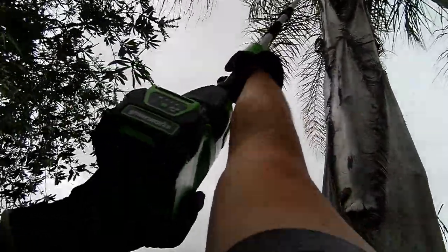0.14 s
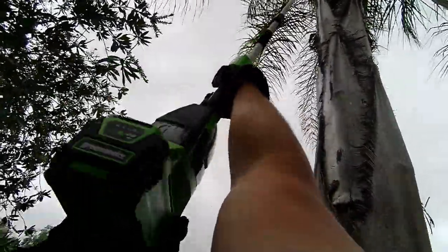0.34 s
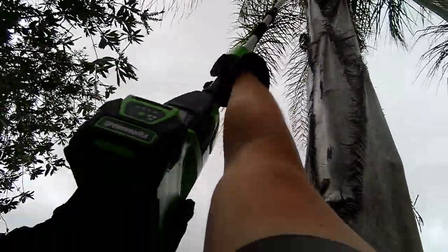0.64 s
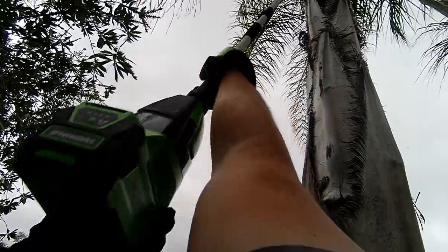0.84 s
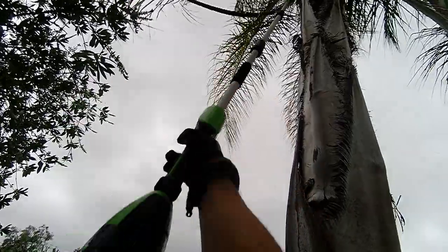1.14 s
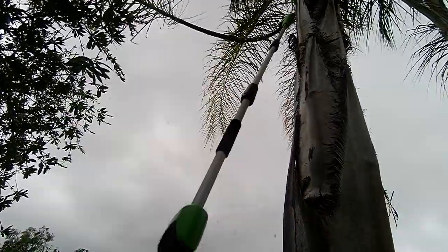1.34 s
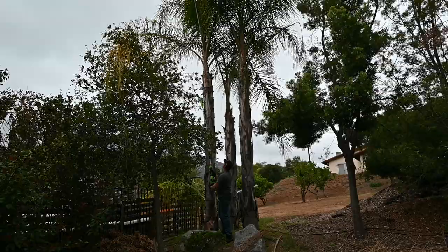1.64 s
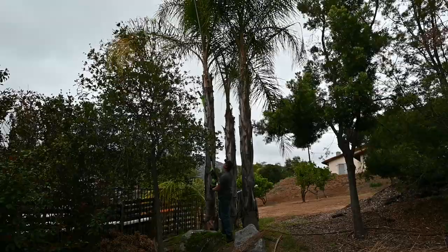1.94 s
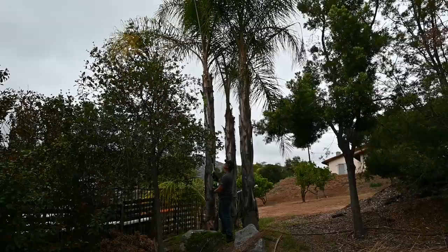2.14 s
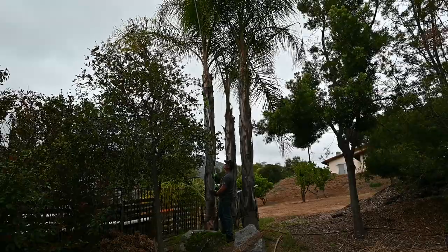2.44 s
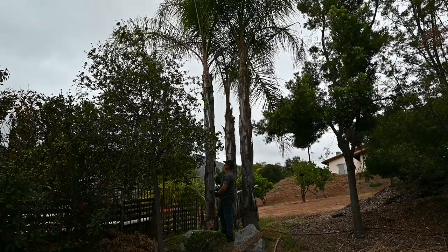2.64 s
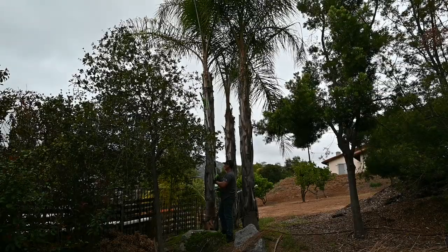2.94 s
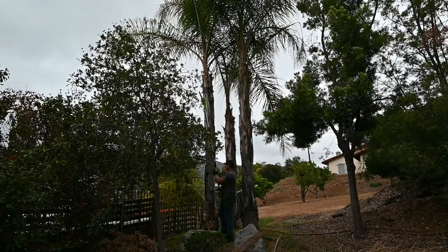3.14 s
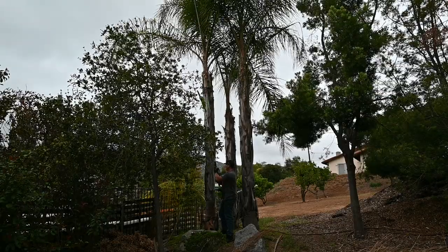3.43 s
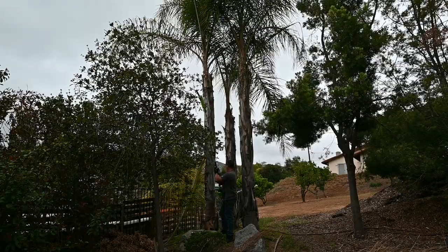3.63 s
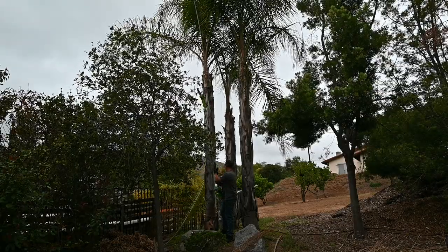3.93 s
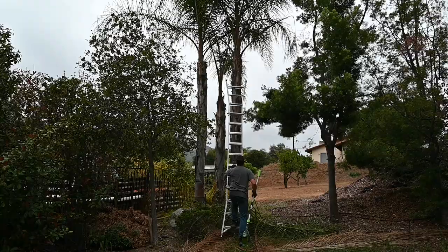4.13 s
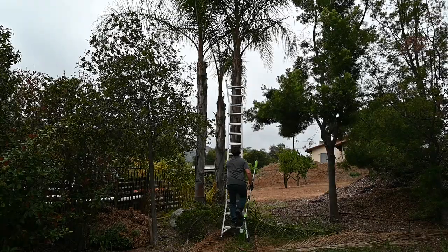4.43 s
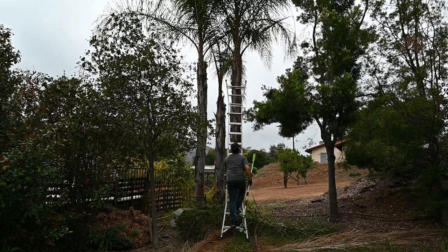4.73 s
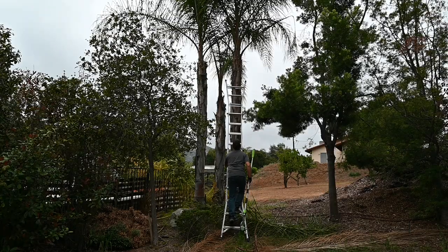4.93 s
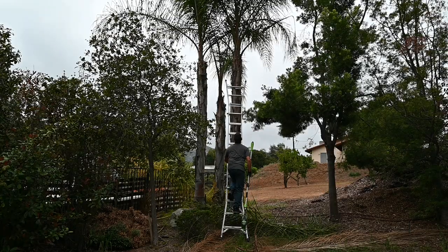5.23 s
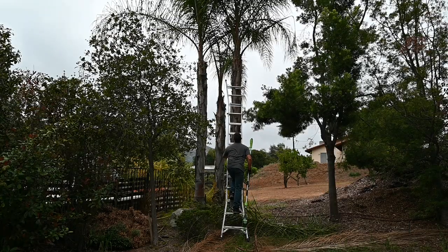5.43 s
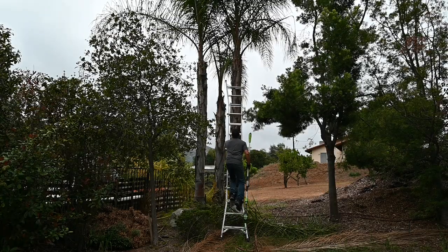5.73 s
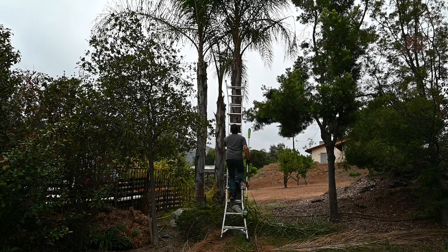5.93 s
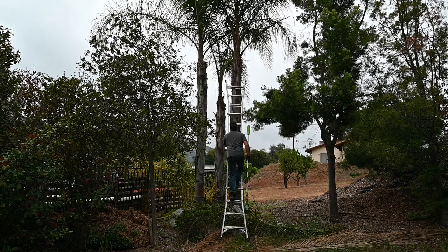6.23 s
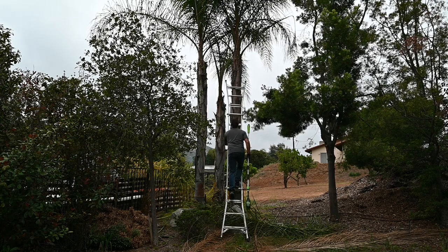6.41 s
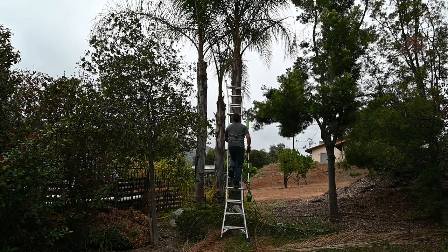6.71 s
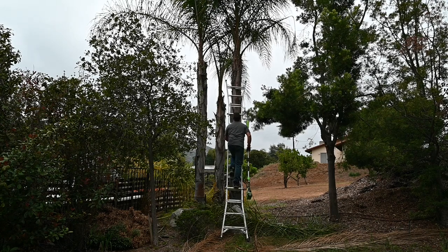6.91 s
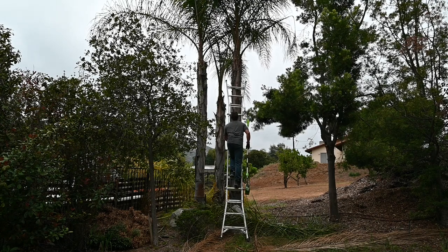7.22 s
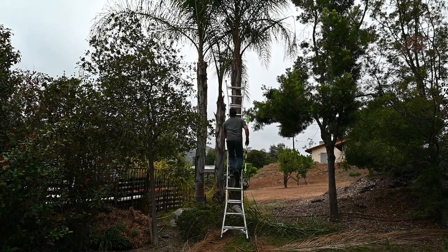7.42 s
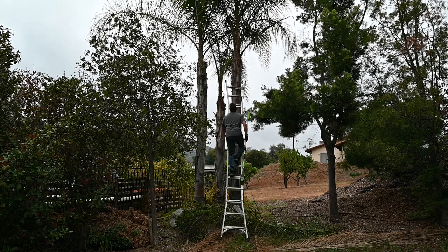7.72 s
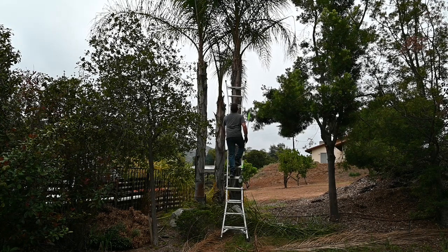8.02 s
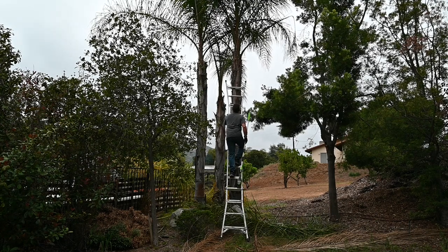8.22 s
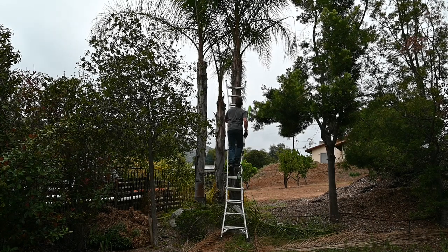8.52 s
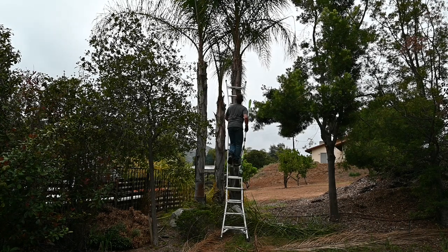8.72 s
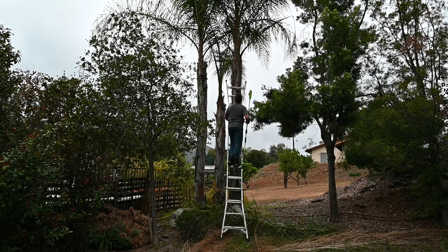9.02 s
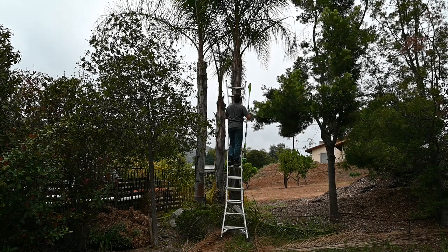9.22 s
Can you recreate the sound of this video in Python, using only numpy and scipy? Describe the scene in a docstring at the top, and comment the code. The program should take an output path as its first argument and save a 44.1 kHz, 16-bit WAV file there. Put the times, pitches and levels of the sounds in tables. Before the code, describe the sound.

Outdoors, the microphone hears a battery saw already at full speed: gritty chain chatter, hollow housing rattle, thin gear whine. Its pitch dips twice in the cut, then drops quickly and the slack chain slaps to rest. Dry leaflets rush down, land, rustle and crack. After a hard cut, much softer footsteps ring on metal rungs, joints tick, and scattered birds call over steady air and hum.

```python
"""A cordless pole saw bites through a palm frond and coasts to a stop, its chain clacking ever slower.
The frond swishes down, snaps and settles in dry leaves. After an abrupt change of scene someone climbs
an aluminium ladder while birds call in the garden. Soft air and a low hum run under everything.
Friction is random grains in filtered bands, whines follow the sprocket, impacts ring through resonances,
and birds are tones of gliding or shaken pitch."""
import sys
import numpy as np
from scipy import signal
from scipy.fft import rfft, irfft
from scipy.io import wavfile
from scipy.ndimage import uniform_filter1d

SR = 44100
rng = np.random.default_rng(int(sys.argv[2]) if len(sys.argv) > 2 else 0)


def transcribe(signal):
    """Save signal, clipped to [-1, 1], as a 16-bit WAV file at the path in sys.argv[1]."""
    frames = np.atleast_2d(signal).T
    limited = np.clip(frames, -1, 1)
    pcm = np.round(limited * 32767).astype(np.int16)
    wavfile.write(sys.argv[1], SR, pcm)


N = 412776
TIME = np.arange(N) / SR
STOP_S, SCENE_CHANGE_S = 2.205, 4.15

# Teeth catching in the stalk. Each row: centre in seconds, length in seconds, level in dB.
BITE_EVENTS = [(0.312, 0.065, -27), (0.902, 0.0162, -28.5), (0.913, 0.016, -33.5), (0.935, 0.0182, -18),
               (1.008, 0.022, -25), (1.078, 0.0376, -26), (1.12, 0.016, -25), (1.264, 0.0242, -27),
               (1.319, 0.029, -31), (1.381, 0.023, -23.5)]
# Notches of the microphone port. Each row: centre in Hz, width in Hz, gain at full depth in dB.
MIC_PORT_NOTCHES = [(4813, 148, -11.5), (5930, 1340, -15.5)]
# Spectrum of dragging or stirring stalks. Each row: frequency in Hz, relative level in dB per Hz.
STALK_SPECTRUM = [(80, -33.5), (200, -13.5), (450, -3.5), (800, 2), (1100, 0.5), (1550, 1), (2100, -3),
                  (3500, -2.5), (6000, -26)]
# Spectrum of gritty ticks and diffuse treble. Each row: frequency in Hz, relative level in dB per Hz.
TICK_SPECTRUM = [(3000, -34), (6200, -7.5), (7800, 10.5), (9500, 8.5), (12500, -2), (15000, -38.5)]
# Spectrum of garden air. Each row: frequency in Hz, relative level in dB per Hz.
GARDEN_SPECTRUM = [(76, -24.5), (130, -11), (228, -4.5), (434, -5.5), (520, -1.5), (598, -4.5), (661, -2),
                   (842, -4.5), (1730, -10), (1960, -12), (4370, -14.5), (4830, -18.5), (15800, -26)]


def from_db(db):
    """Amplitude ratio of a level in dB."""
    return 10 ** (np.asarray(db) / 20)


def rms_one(x):
    """Scale to rms 1."""
    return x / np.sqrt(np.mean(x ** 2) + 1e-20)


def fade(start_s, end_s):
    """Ramp from 0 at start to 1 at end."""
    return np.clip((TIME - start_s) / (end_s - start_s), 0, 1)


def swell(centre_s, length_s):
    """A smooth hump of height 1."""
    return np.exp(-2 * ((TIME - centre_s) / length_s) ** 2)


def noise():
    """White noise of rms 1."""
    return rng.standard_normal(N)


def drift(rate_hz, count=N):
    """Slow random wander of rms near 1: noise through two equal low-pass poles."""
    r = np.exp(-2 * np.pi * rate_hz / SR)
    return rms_one(signal.lfilter([1], [1, -2 * r, r * r], rng.standard_normal(count + SR))[SR:])


def body(x, spectrum, resonances=()):
    """Causal filter from a smooth spectrum and resonances; white noise keeps its power."""
    size = 2 ** 13
    hz = np.maximum(np.arange(size // 2 + 1) * SR / size, 1)
    points = np.array(spectrum)
    db = np.interp(np.log(hz), np.log(points[:, 0]), points[:, 1])
    for centre_hz, width_hz, boost_db in resonances:
        db = db + boost_db / (1 + (2 * (hz - centre_hz) / width_hz) ** 2)
    cepstrum = irfft(np.log(from_db(db)))
    # minimum phase: nothing sounds early
    response = irfft(np.exp(rfft(2 * cepstrum[:size // 2], size)))
    return signal.oaconvolve(x, response / np.linalg.norm(response))[:N]


def grains(per_s, spread_db):
    """Random clicks of uneven size; rms 1."""
    sizes = from_db(spread_db * np.minimum(rng.exponential(1, N), 4)) * rng.choice([-1, 1], N)
    return rms_one(sizes * (rng.random(N) < per_s / SR))


def blows(times_s, levels_db, t60_s):
    """An envelope that jumps at each blow and dies away by 60 dB in t60."""
    kicks = np.zeros(N)
    kicks[np.round(np.asarray(times_s) * SR).astype(int)] = from_db(levels_db)
    return signal.lfilter([1], [1, -from_db(-60 / (t60_s * SR))], kicks + 1e-18)


def background():
    """Soft garden air, rumble, faint stirring leaves and a hum that skips half a cycle as the scene changes."""
    # Each row: frequency in Hz, relative level in dB per Hz.
    rumble_spectrum = [(20, -18), (45, -6), (120, 1), (200, -28), (500, -53)]
    hum_hz, hum_db = 91.38, -50.5
    air = from_db(-58.3066 + 0.213 * drift(2.37)) * body(noise(), GARDEN_SPECTRUM)
    rumble = from_db(-74.0) * body(noise(), rumble_spectrum)
    stirring_db = -71.0 + 3.17 * drift(2.6)
    leaves = from_db(stirring_db) * body(grains(250, spread_db=3.0), STALK_SPECTRUM)
    cycles = hum_hz * TIME + .5 * fade(SCENE_CHANGE_S - .002, SCENE_CHANGE_S)
    hum = from_db(hum_db) * np.sqrt(2) * np.sin(2 * np.pi * cycles)
    return air + rumble + leaves + hum


def note(start_s, length_s, pitch, db, rasp_hz, partials=((1, 0),)):
    """A bird note; pitch gives Hz over its course 0 to 1, rasp shakes it, partials are (multiple, dB)."""
    skew = 0.686   # under 1: peaks early
    flutter_db, flutter_hz = 1.5, 29
    u = np.linspace(0, 1, int(length_s * SR))
    shake = rms_one(uniform_filter1d(rng.standard_normal(len(u)), size=40))
    phase = 2 * np.pi * np.cumsum(pitch(u) + rasp_hz * shake) / SR
    flutter = from_db(flutter_db * drift(flutter_hz, count=SR)[:len(u)])
    envelope = np.sqrt(2 * np.abs(np.sin(np.pi * u ** skew)))
    waves = sum(from_db(db + part_db) * np.sin(k * phase) for k, part_db in partials)
    return np.pad(flutter * envelope * waves, (int(start_s * SR), N))[:N]


def whistle(start_s, length_s, start_hz, end_hz, db):
    """A slurred tone: pitch moves quickly at first, flattening towards its last value."""
    bend = 2.2   # time constants in one whistle

    def slur(u):
        return start_hz + (end_hz - start_hz) * np.expm1(-bend * u) / np.expm1(-bend)
    return note(start_s, length_s, slur, db, rasp_hz=22)


def mew(start_s, length_s, hz, arch_hz, db):
    """A nasal note: overtones 2 to 5 of an arched pitch, coloured by the throat."""
    # Throat response. Each row: frequency in Hz, gain in dB.
    throat_response = [(1200, -10.5), (1800, -9), (3000, -8), (4100, 4.5), (6100, -2), (8200, -21)]
    multiples = np.arange(2, 6)
    throat_hz, throat_db = np.transpose(throat_response)
    partials = zip(multiples, np.interp(multiples * hz, throat_hz, throat_db))
    return note(start_s, length_s, lambda u: hz + arch_hz * np.sin(np.pi * u), db, rasp_hz=10.7,
                partials=partials)


def rasp(start_s, length_s, db):
    """A chirp roughened by fast random shaking of its pitch."""
    return note(start_s, length_s, lambda u: np.full(len(u), 4230), db, rasp_hz=562)


def birds():
    """Whistles, nasal notes and rasps, scattered by the trees as a decaying noise echo."""
    # Each row: start in seconds, length in seconds, start in Hz, end in Hz, level in dB.
    whistle_events = [(5.606, 0.08, 5510, 4358, -55), (5.693, 0.126, 3190, 3534, -58),
                      (5.793, 0.069, 3530, 3530, -67), (5.95, 0.053, 2165, 2096, -69),
                      (6.022, 0.0396, 2355, 2600, -66), (7.255, 0.1, 3424, 2697, -66.5),
                      (7.867, 0.109, 3250, 2540, -70.5), (7.955, .05, 5770, 5390, -71.5),
                      (8.303, 0.0532, 4400, 4856, -59), (8.641, 0.0298, 3985, 4550, -65.5),
                      (8.65, 0.067, 2173, 2867, -59), (8.77, 0.097, 2930, 2666, -64),
                      (9.0, .42, 5400, 4280, -67.5)]
    # Each row: start in seconds, length in seconds, pitch in Hz, arch in Hz, level in dB.
    mew_events = [(5.582, 0.056, 1351, 16.8, -61.5), (8.39, 0.22, 1980, 66, -59.5),
                  (8.719, 0.063, 525.7, 94, -55.5), (9.127, 0.0588, 606, 53.6, -56),
                  (9.30, 0.025, 545, 40.5, -55.5)]
    # Each row: start in seconds, length in seconds, level in dB.
    rasp_events = [(5.403, 0.0514, -60), (6.869, 0.079, -63.5), (8.019, .042, -58.5), (8.268, 0.099, -59)]
    song = sum(whistle(*row) for row in whistle_events)
    song = song + sum(mew(*row) for row in mew_events)
    song = song + sum(rasp(*row) for row in rasp_events)
    scatter = rng.standard_normal(SR // 2) * from_db(-60 * TIME[:SR // 2] / 0.296)   # t60 in s
    return song + from_db(-3.5) * signal.oaconvolve(song, scatter / np.linalg.norm(scatter))[:N]


def ladder():
    """Boots thud on rungs and ring the rails; joints clank and tick with grit; the garden adds a faint tail."""
    # Boots on rungs. Each row: start in seconds, peak level in dB, rail ring level in dB.
    boot_events = [(4.313, -53.5, -44.5), (4.387, -38.5, -49.5), (4.413, -41, -50), (4.769, -39, -44.5),
                   (5.496, -35.5, -37.5), (5.503, -35, -61.5), (5.552, -36.5, -59.5), (5.622, -41, -64),
                   (6.303, -43, -64.5), (6.425, -35, -47.5), (6.591, -43.5, -59.5), (6.668, -49, -58.5),
                   (7.047, -34.5, -46), (7.325, -46, -51), (7.414, -44.5, -51), (7.949, -43.5, -54.5),
                   (8.039, -42, -50.5), (8.564, -37.5, -55.5), (8.613, -37, -48.5), (8.688, -45.5, -61),
                   (9.064, -33, -42), (9.171, -37, -48.5), (9.237, -35, -43.5), (9.277, -38, -50)]
    # Joints knocking as weight shifts. Each row: start in seconds, peak level in dB, grit level in dB.
    clank_events = [(4.246, -43.5, -73.5), (4.3139, -34.5, -49.5), (4.8172, -42.5, -53.5),
                    (5.4935, -40, -59.5), (5.882, -37, -56), (6.2601, -46.5, -71), (6.3026, -50.5, -59.5),
                    (6.4053, -41.5, -59.5), (6.421, -51, -60.5), (7.4157, -47.5, -69.5),
                    (7.6144, -46.5, -63), (8.3712, -40.5, -54), (9.1687, -44.5, -63.5), (9.2352, -45, -58)]
    # Spectra of thud, rails and clank. Each row: frequency in Hz, relative level in dB per Hz.
    thud_spectrum = [(80, -14), (200, -2.5), (350, 6.5), (580, 7), (800, 2), (1100, -17.5), (2200, -38.5),
                     (5000, -62.5)]
    rail_spectrum = [(300, -39.5), (650, -9), (900, 5), (1400, -1.5), (1800, -8.5), (2600, -36.5),
                     (6000, -47.5)]
    clank_spectrum = [(900, -11.5), (1700, 2.5), (2400, -4), (3500, -2), (4800, -3.5), (6200, -21.5),
                      (12000, -53)]
    # Ladder resonances. Each row: centre in Hz, width in Hz, boost in dB.
    rung_modes = [(375, 50, -1.5), (574, 40, 4), (797.5, 54, 6), (1086, 23, 5.5), (1360, 80, 1),
                  (1775, 88, -6), (2504, 130, 6.5), (3350, 120, -2), (4330, 180, -1.5)]
    thud_db = -10   # against a boot's peak
    ring_db, scuff_db = -3, -9   # ring onset and sole scuff, against rail ring level
    knock_db, jolt_db = -7.5, -18.5   # clank and frame thud, against a joint's peak
    boot_s, boot_db, rail_db = np.transpose(boot_events)
    clank_s, clank_db, grit_db = np.transpose(clank_events)

    def contact(times_s, level_db, spectrum, t60_s, tail_db, hard):
        """Decaying chatter and a first-touch click, rung by the ladder."""
        rattle = blows(times_s, level_db, t60_s) + blows(times_s, level_db + tail_db, t60_s=0.78)
        click = blows(times_s, level_db, t60_s=1 / SR) * np.sqrt(t60_s * SR)
        chatter = grains(7000, spread_db=0)
        return body(rattle * chatter + hard * click, spectrum, rung_modes)

    thud = contact(boot_s, boot_db + thud_db, thud_spectrum, t60_s=0.0946, tail_db=-29, hard=0.226)
    ring = contact(boot_s, rail_db + ring_db, rail_spectrum, t60_s=0.1275, tail_db=-48.0, hard=0.142)
    scuff = contact(boot_s, rail_db + scuff_db, clank_spectrum, t60_s=0.0705, tail_db=-21.5, hard=0.047)
    clank = contact(clank_s, clank_db + knock_db, clank_spectrum, t60_s=0.094, tail_db=-17.0, hard=0.094)
    jolt = contact(clank_s, clank_db + jolt_db, thud_spectrum, t60_s=0.11, tail_db=-20, hard=0.062)
    grit = contact(clank_s, grit_db, TICK_SPECTRUM, t60_s=0.0766, tail_db=-19, hard=0.042)
    return thud + ring + scuff + clank + jolt + grit


def frond():
    """Leaflets brush, louder until the frond lands; then it rustles, the stalk drags and dry stalks snap."""
    # Dry stalks breaking. Each row: start in seconds, peak level in dB.
    snap_events = [(3.404, -34.5), (3.456, -38), (3.58, -30.5), (3.681, -28.5), (3.889, -45.5),
                   (3.984, -35.5)]
    # Heavy end bumping down. Each row: start in seconds, level in dB.
    bump_events = [(2.905, -49), (2.96, -48.5)]
    # Spectra of leaflets, snaps and bumps. Each row: frequency in Hz, relative level in dB per Hz.
    leaflet_spectrum = [(900, -24), (1700, -8), (2500, -1.5), (4000, 1), (5400, 3), (7000, -0.5), (8500, 0),
                        (10500, -5.5), (13000, -14), (15800, -20)]
    snap_spectrum = [(300, -9), (800, 6), (1500, 1), (2400, -2.5), (4200, 6), (6000, -21.5), (14000, -20.5)]
    bump_spectrum = [(80, -22.5), (170, -14), (250, 1.5), (500, 1.5), (1200, -27), (4000, -50)]
    # Frond resonances. Each row: centre in Hz, width in Hz, boost in dB.
    frond_modes = [(1545, 430, 9), (5204, 450, 1.5)]
    landing_s, build_db_per_s, settle_db_per_s = 3.0243, 2.5, 64
    swish_db, drag_db = -34, -42   # leaflets and stalk at landing
    rustle_db, rustle_fall_db_per_s, ground_drag_db = -47, 1.07, -49.5
    crack_db, crunch_db, crunch_t60_s = -12.5, -14, 0.326   # levels against a break's peak
    since_s = TIME - landing_s
    falling_db = np.minimum(build_db_per_s * since_s, -settle_db_per_s * since_s)
    falling = from_db(falling_db) * fade(1.61, 2.059)
    snap_s, snap_db = np.transpose(snap_events)
    crunch = blows(snap_s, snap_db + crunch_db, crunch_t60_s)

    rustle = from_db(rustle_db - rustle_fall_db_per_s * since_s) * (since_s > 0)
    swish_level = np.hypot(from_db(swish_db) * falling, rustle) * from_db(0.73 * drift(24))
    notches = [(hz, width_hz, db * 0.612) for hz, width_hz, db in MIC_PORT_NOTCHES]
    swish = swish_level * body(grains(18000, spread_db=3.0), leaflet_spectrum, frond_modes + notches)

    ground_drag = from_db(ground_drag_db) * (TIME > snap_s[0])
    drag_level = np.hypot(from_db(drag_db) * falling + crunch, ground_drag) * from_db(0.62 * drift(25))
    drag = drag_level * body(grains(3500, spread_db=2.0), STALK_SPECTRUM)

    cracks = body(blows(snap_s, snap_db + crack_db, t60_s=0.084) * noise(), snap_spectrum)
    bump_level = blows(*np.transpose(bump_events), t60_s=0.143)
    bumps = body(bump_level * grains(3500, spread_db=1.0), bump_spectrum)
    return (swish + drag + cracks + bumps) * (TIME < SCENE_CHANGE_S)


def slaps():
    """Each slap of the slack, slowing chain rings the pole; the ring stays in the mid band, without bass."""
    # Each row: start in seconds, level in dB before the common 0.5 dB lift.
    slap_events = [(1.553, -18), (1.585, -18.5), (1.612, -31), (1.67, -22), (1.815, -27.5), (1.878, -31)]
    # Pole modes. Each row: frequency in Hz, relative level in dB, t60 in seconds.
    slap_modes = [(972, -12.5, 0.032), (1219, -23.5, 0.058), (1530, -27, 0.028), (1713, -2.5, 0.0555),
                  (2833, -14.5, 0.035)]
    slap_s, slap_db = np.transpose(slap_events)
    rings = np.zeros(N)
    for hz, mode_db, t60_s in slap_modes:
        envelope = blows(slap_s, slap_db + mode_db + .5, t60_s)
        rings += envelope * np.sin(2 * np.pi * hz * TIME + .5 * drift(59))
    return signal.sosfilt(signal.butter(2, [600, 3500], "band", fs=SR, output="sos"), rings)


def bites():
    """Teeth tear fibres in short gritty bursts."""
    # Each row: frequency in Hz, relative level in dB per Hz.
    bite_spectrum = [(100, -26), (200, -16.5), (450, -1), (850, 2), (1500, 4), (2200, -3.5), (3200, -3.5),
                     (6000, -19.5), (15000, -21)]
    force = sum(from_db(db) * swell(s, length_s) for s, length_s, db in BITE_EVENTS)
    return body(force * grains(3500, spread_db=2.5), bite_spectrum)


def sprocket_speed():
    """Sprocket turns per s: once the trigger is let go the motor brakes hard, then the chain coasts down."""
    # Driven speed, sagging twice under load. Each row: time in seconds, speed in turns per second.
    driven_speed = [(0.0, 66.02), (0.21, 67.77), (0.26, 66.82), (0.33, 61.21), (0.42, 67.16), (0.57, 68.75),
                    (0.67, 68.1), (0.885, 70.55), (0.96, 61.2), (1.2, 66.2), (1.25, 64.26)]
    brake_turns_per_s2, coast_turns_per_s2 = 181, 44
    driven = np.interp(TIME, *np.transpose(driven_speed))
    release_s = driven_speed[-1][0]
    braked = driven - brake_turns_per_s2 * np.maximum(TIME - release_s, 0)
    coasting = np.minimum(coast_turns_per_s2 * (STOP_S - TIME), driven)
    return np.maximum(np.maximum(braked, coasting), 1)


def chain_beat(turns, speed, clack, clack_s, link, uneven_db):
    """One hard clack per sprocket turn and a lighter one per tooth, over steady sliding; mean power near 1."""
    def strikes(cycles, per_s, decay_s):
        sizes = from_db(uneven_db * rng.standard_normal(2 ** 12))
        since_s = cycles % 1 / per_s
        return sizes[cycles.astype(int) % len(sizes)] * np.exp(-since_s / decay_s)
    teeth = 6
    clacks = clack * strikes(turns, speed, clack_s)
    links = link * strikes(teeth * turns, teeth * speed, clack_s / 2)
    power = 1 + clacks ** 2 + links ** 2
    return np.sqrt(power / uniform_filter1d(power, SR // 10))


def saw():
    """Chain and housing rattle in step with the sprocket under motor and gear whine; all grow with speed."""
    # Spectra of chain and housing. Each row: frequency in Hz, relative level in dB per Hz.
    chain_spectrum = [(1180, -38), (2000, -3.5), (2950, -1.5), (3830, -0.5), (4790, -3), (5220, -1),
                      (6100, -16), (6480, -8), (7640, -5), (9490, -5.5), (13200, -23.5), (14500, -21.5),
                      (15800, -32)]
    housing_spectrum = [(120, -39), (320, -18.5), (410, -10), (560, -5), (700, -4.5), (1000, -3),
                        (1250, -2), (1750, 3), (2050, -8.5), (2600, -13), (5000, -43)]
    # Resonances of bar and pole. Each row: centre in Hz, width in Hz, boost in dB.
    bar_modes = [(3793, 525, 4), (4356, 190, 5), (6530, 200, 1), (7867, 31, 11.5), (11800, 490, 6)]
    pole_modes = [(408.2, 28.3, 10.4), (1221, 76, 9.2), (1355.8, 27.5, 9), (1558, 63, 4.5),
                  (1735.3, 38, 5.4)]
    # Lines of motor, shrill whine and gears. Each row: multiple of sprocket rate, relative level in dB.
    motor_orders = [(6, -22), (7, -19.5), (12, 0.5)]
    shrill_orders = [(68.3, -7), (136.6, -6.5)]
    gear_orders = [(18, -15.5), (23, -12.5), (24, -29.5), (26, -12), (36.2, -13), (38, -7), (48, -11.5),
                   (49, -2), (55, -1.5), (56, -5.5), (57, -14.5), (73, -13.5)]
    free_turns_per_s, start_turn = 67, .75
    stroke_s, nearest_s = 0.671, 0.0648   # the stroke rocks the housing to and from the microphone

    speed = sprocket_speed()
    speed_db = 20 * np.log10(speed / free_turns_per_s)
    strain = swell(1.3053, 0.0815)   # the last fibres
    in_cut = fade(BITE_EVENTS[1][0], BITE_EVENTS[3][0]) * (TIME < BITE_EVENTS[-1][0])
    rocking = np.cos(2 * np.pi * (TIME - nearest_s) / stroke_s)
    # dB at free speed, dB per dB of speed, dB under strain
    chain_db = -24 + 1.327 * speed_db + 3 * strain
    housing_db = -29 + 1.186 * speed_db + 3 * strain + 1.5 * rocking
    motor_db = -36.5 + 3.1 * speed_db - 12.5 * strain
    motor_db = motor_db - 5.5 * in_cut - 1.5 * rocking   # sings less while buried, more as the stroke eases
    gear_db = -36.5 + 1.66 * speed_db + 4 * strain

    turns = start_turn + np.cumsum(speed) / SR
    coasting = fade(1.476, 1.48)   # slack chain clacks harder against less sliding
    beat = chain_beat(turns, speed, clack=3.16 + 2.36 * coasting, clack_s=0.00174, link=1.35, uneven_db=1.66)
    low = signal.butter(2, 6500, "low", fs=SR, output="sos")
    high = signal.butter(2, 6500, "high", fs=SR, output="sos")
    clatter = signal.sosfilt(low, beat * grains(18000, spread_db=3.27))
    # the top is mostly steady friction
    sliding = signal.sosfilt(high, beat ** 0.75 * grains(18000, spread_db=1.5))
    chain = from_db(chain_db) * body(clatter + sliding, chain_spectrum, bar_modes + [MIC_PORT_NOTCHES[0]])

    beat = chain_beat(turns, speed, clack=1.47, clack_s=0.0088, link=1.2, uneven_db=2.0)
    rattle = beat * grains(6000, spread_db=2.5)
    housing = from_db(housing_db) * body(rattle, housing_spectrum, pole_modes)

    # the chain's pull makes the shaft flutter
    shaft = turns + np.cumsum(speed * 0.001493 * drift(36.7)) / SR
    running = int(STOP_S * SR)

    def lines(level_db, orders):
        """Sines locked to the shaft, each wavering in level."""
        total = np.zeros(running)
        for order, order_db in orders:
            line_db = level_db[:running] + order_db + 2.54 * drift(16.7, count=running)
            total += from_db(line_db) * np.sqrt(2) * np.sin(2 * np.pi * order * shaft[:running])
        return total

    whine = lines(motor_db, motor_orders + shrill_orders) + lines(gear_db, gear_orders)
    whine = np.pad(whine, (0, N - running)) + 1e-18   # offset avoids denormals
    # lines passing the pole's lowest resonance set it ringing
    pole_hz, pole_width_hz, _ = pole_modes[0]
    pole_peak = signal.iirpeak(pole_hz, pole_hz / pole_width_hz, fs=SR)
    whine = whine + from_db(8.5) * signal.lfilter(*pole_peak, whine)
    # the small housing radiates no bass
    whine = signal.sosfilt(signal.butter(4, 330, "high", fs=SR, output="sos"), whine)
    return (chain + housing + whine) * (TIME < STOP_S)


def scene():
    """All sources; both channels are alike but for diffuse treble and a trace of air."""
    mid = background() + birds() + ladder() + frond() + slaps() + bites() + saw()
    band = signal.butter(4, [6800, 15000], "band", fs=SR, output="sos")
    treble_level = np.sqrt(np.abs(uniform_filter1d(signal.sosfilt(band, mid) ** 2, size=300)))
    diffuse = from_db(-14.5) * treble_level * body(signal.sosfilt(band, noise()), TICK_SPECTRUM)
    side = diffuse + from_db(-82.0) * body(noise(), GARDEN_SPECTRUM)
    return np.array([mid + side, mid - side])


def record(dry):
    """A steep elliptic low-pass cuts the top."""
    cutoff_hz = 15850
    return signal.sosfilt(signal.ellip(12, .1, 80, cutoff_hz, fs=SR, output="sos"), dry)


dry = scene()
out = record(dry)
transcribe(out)
```